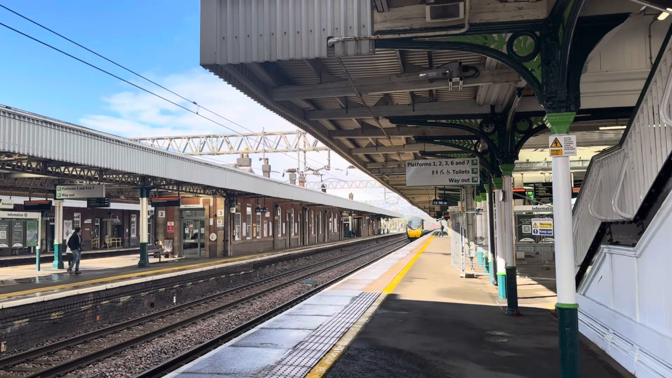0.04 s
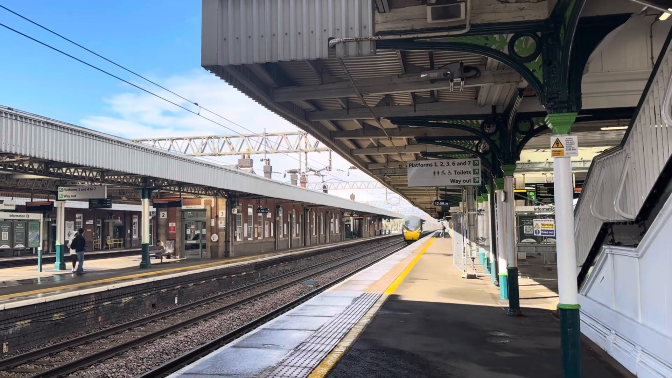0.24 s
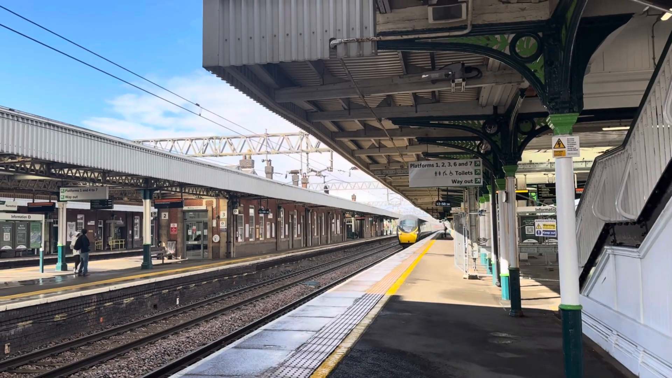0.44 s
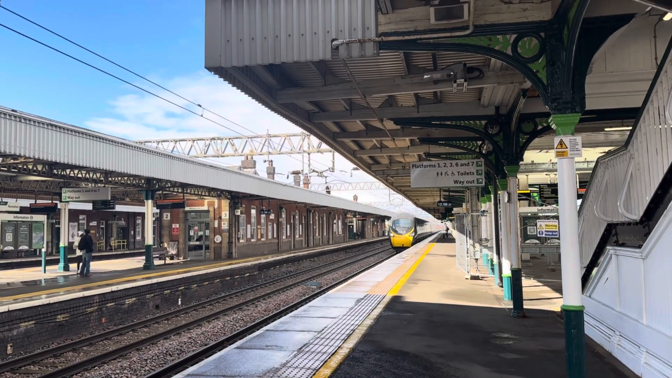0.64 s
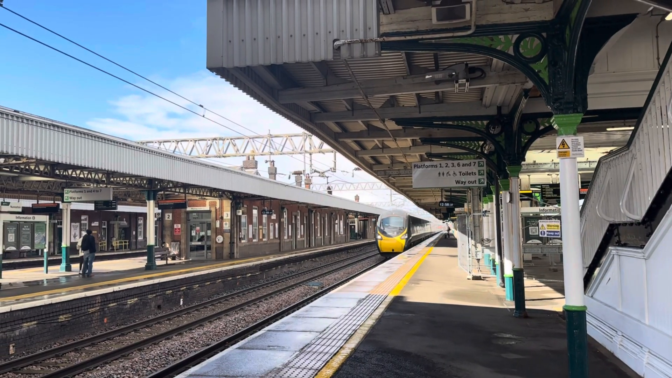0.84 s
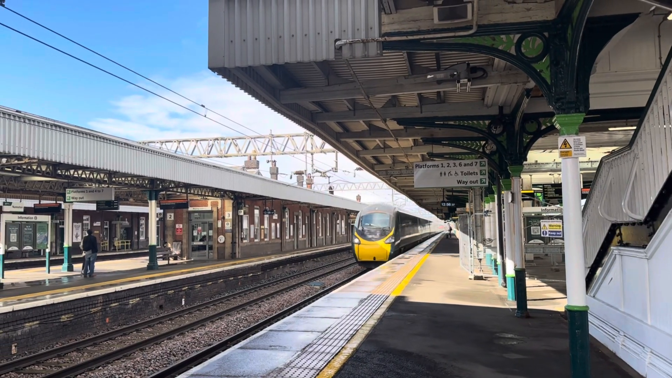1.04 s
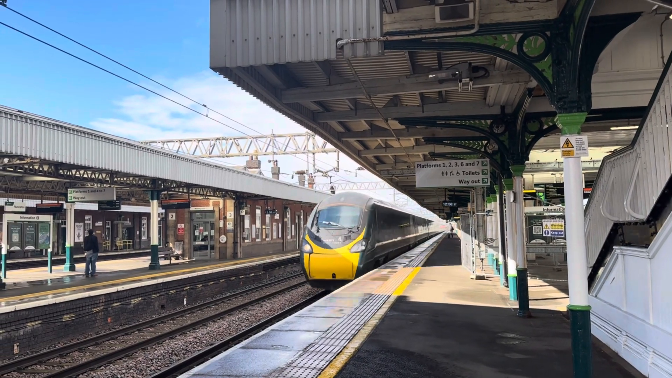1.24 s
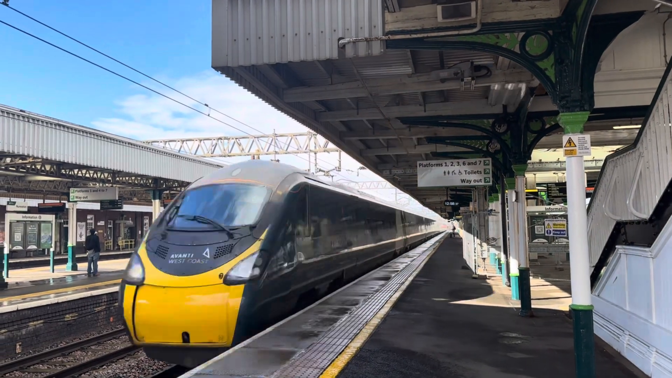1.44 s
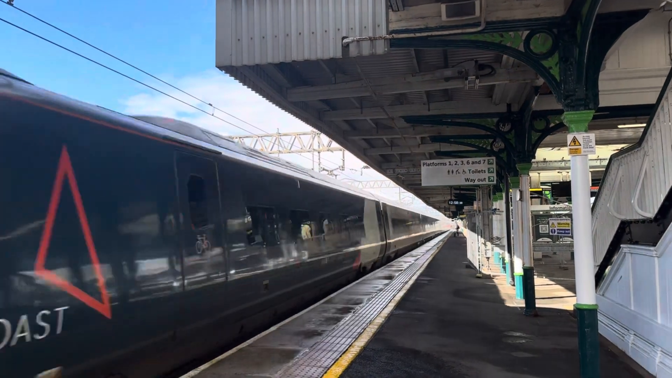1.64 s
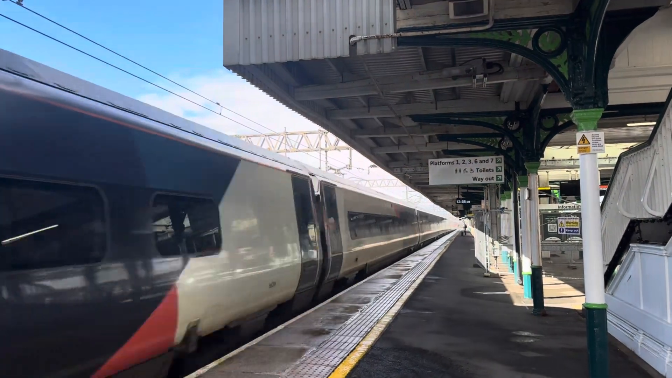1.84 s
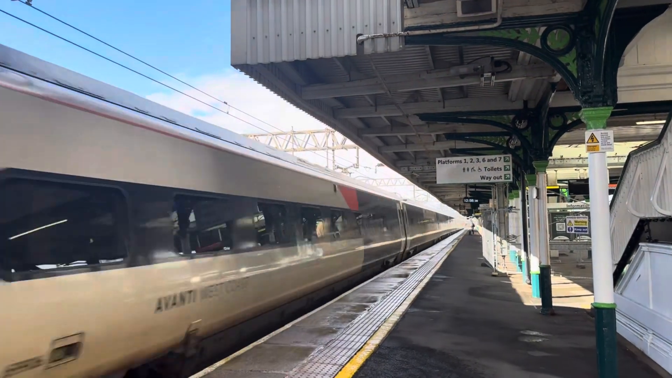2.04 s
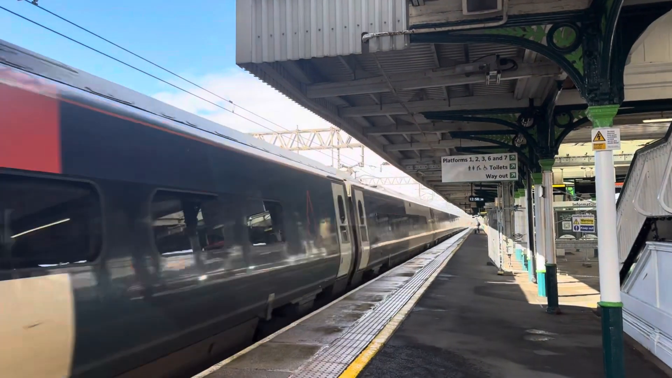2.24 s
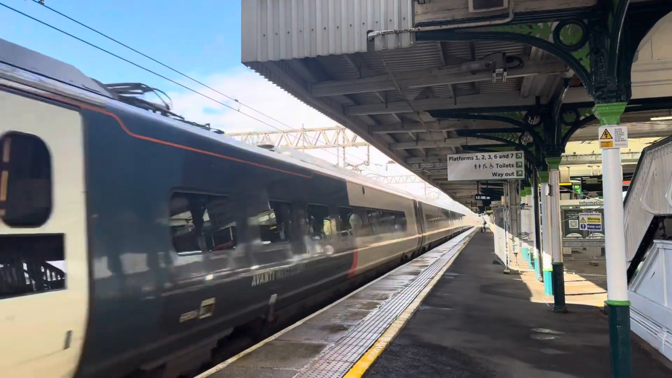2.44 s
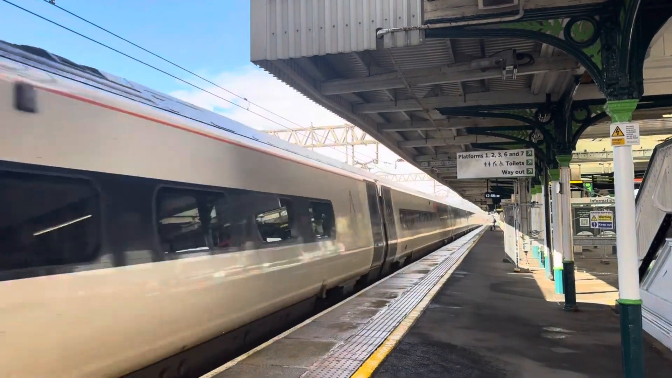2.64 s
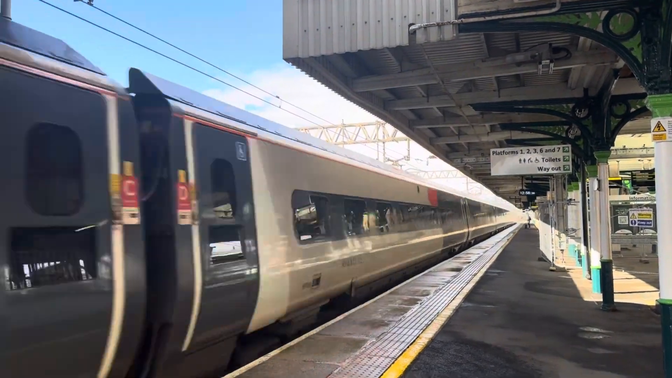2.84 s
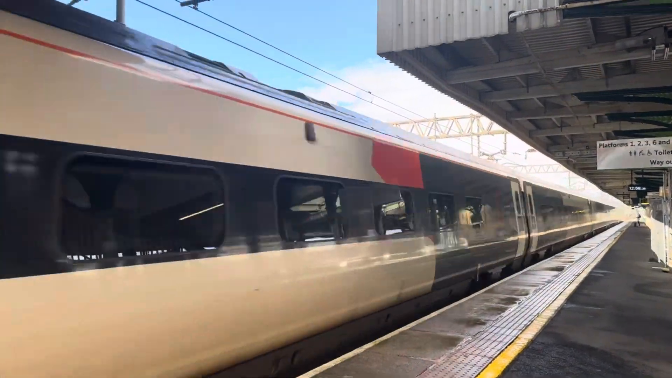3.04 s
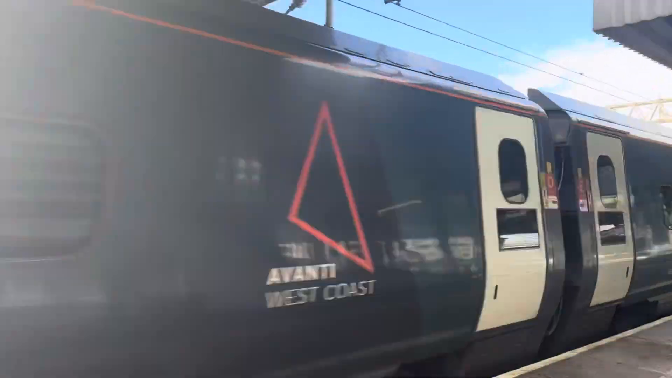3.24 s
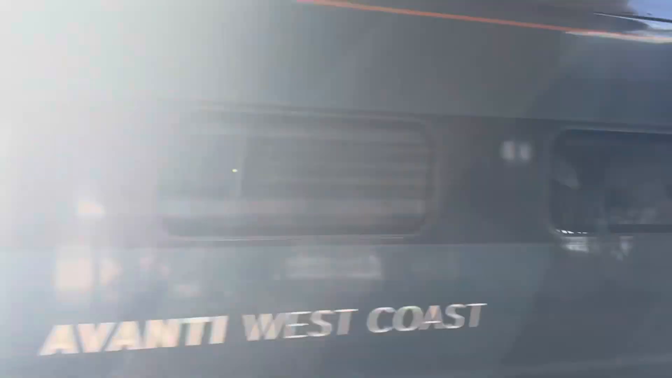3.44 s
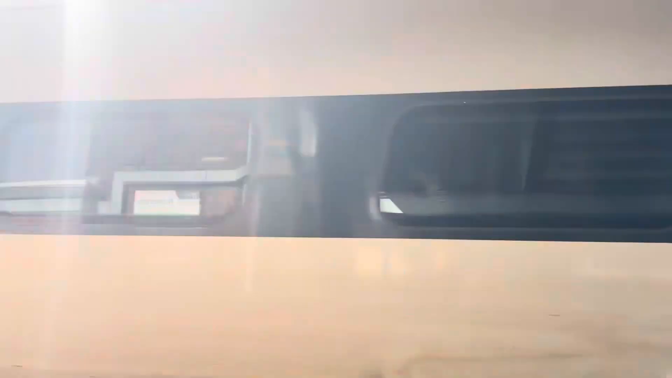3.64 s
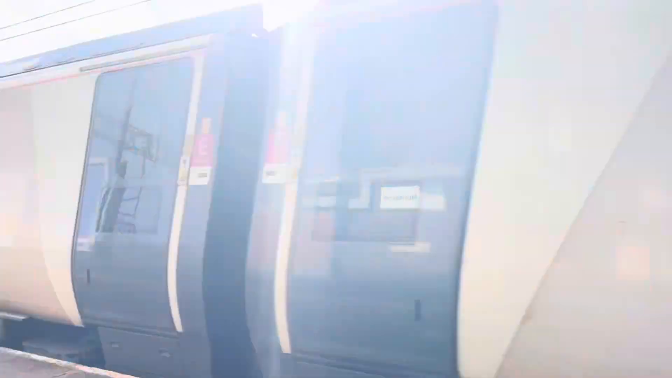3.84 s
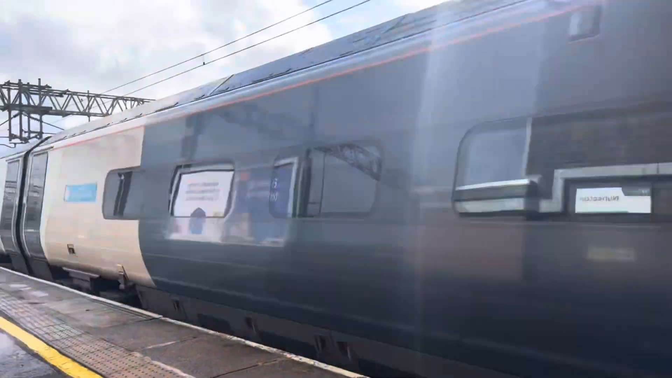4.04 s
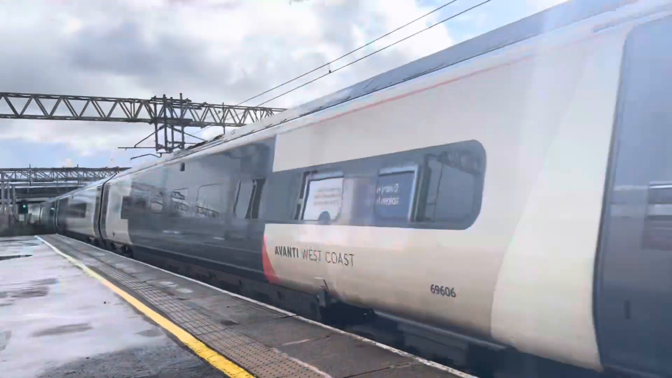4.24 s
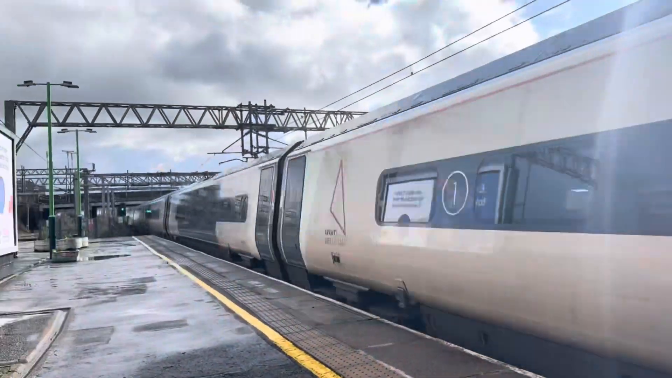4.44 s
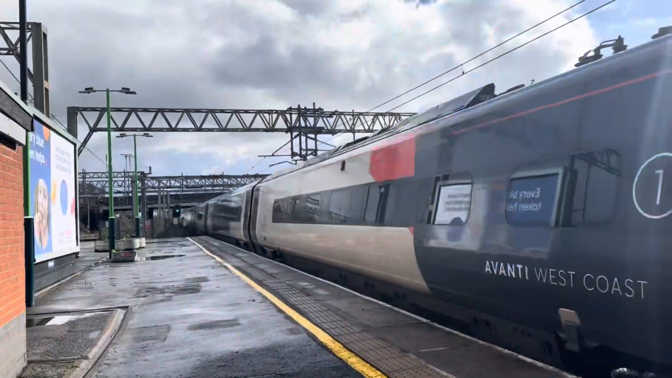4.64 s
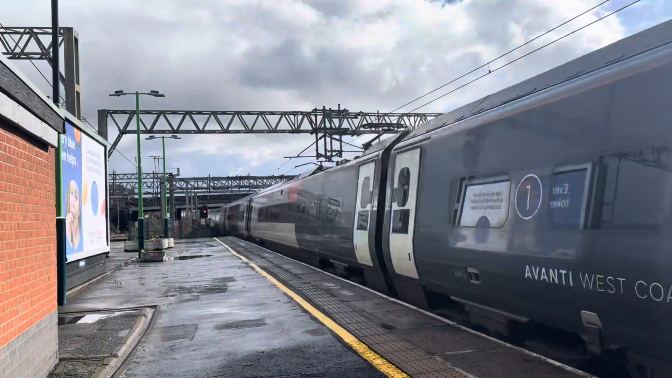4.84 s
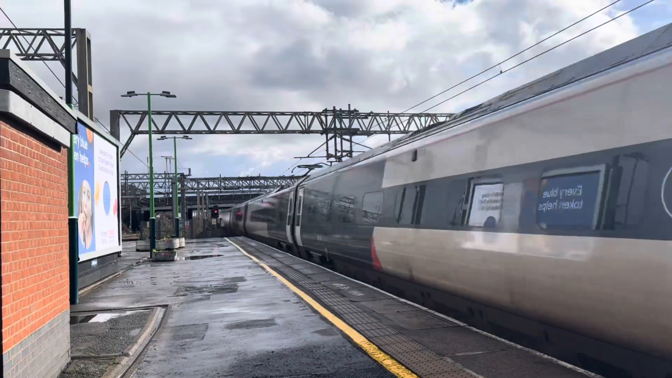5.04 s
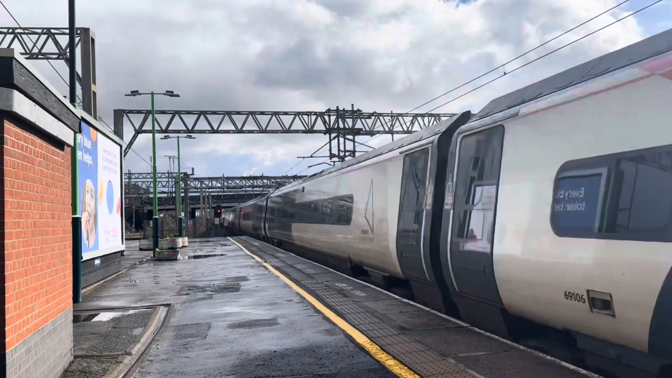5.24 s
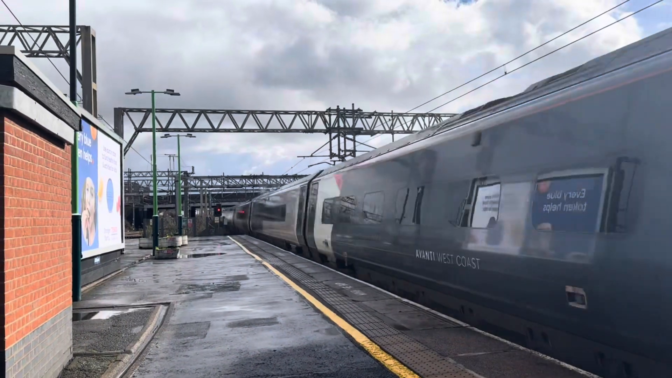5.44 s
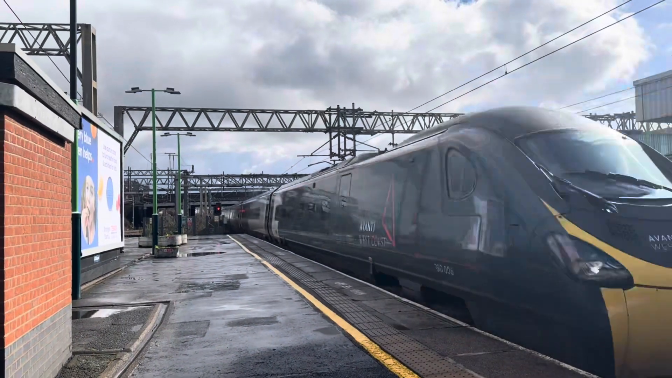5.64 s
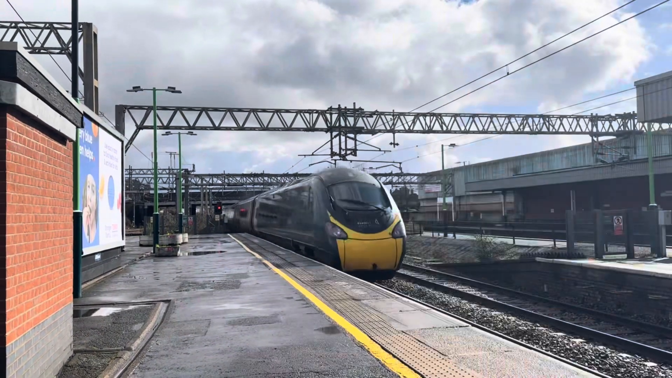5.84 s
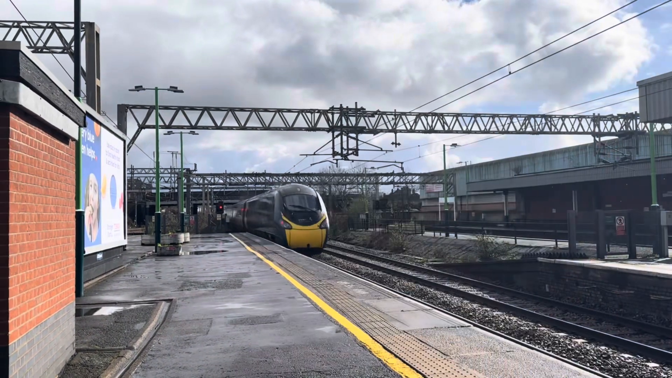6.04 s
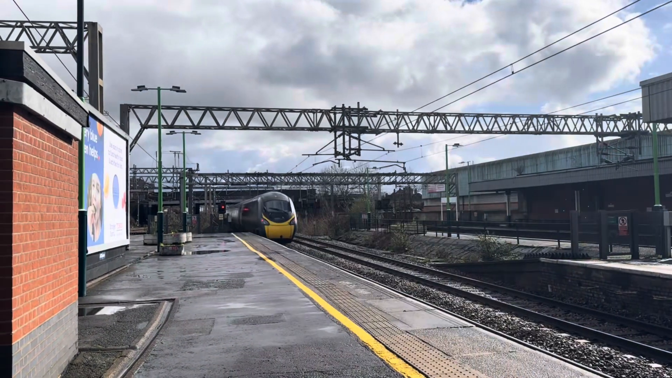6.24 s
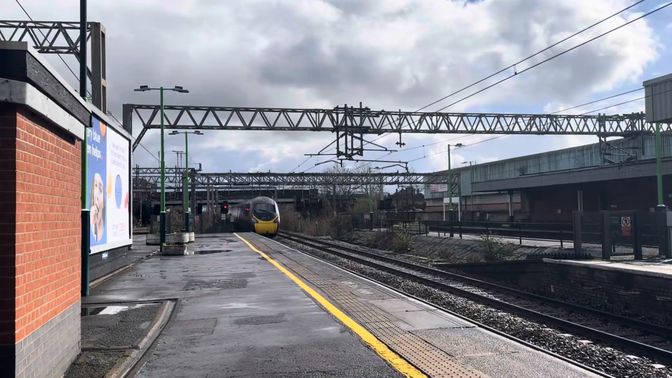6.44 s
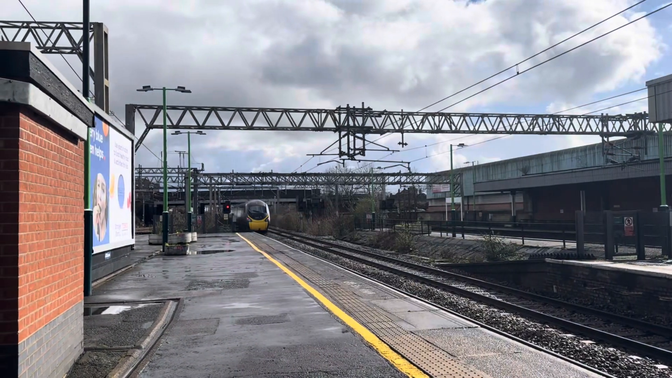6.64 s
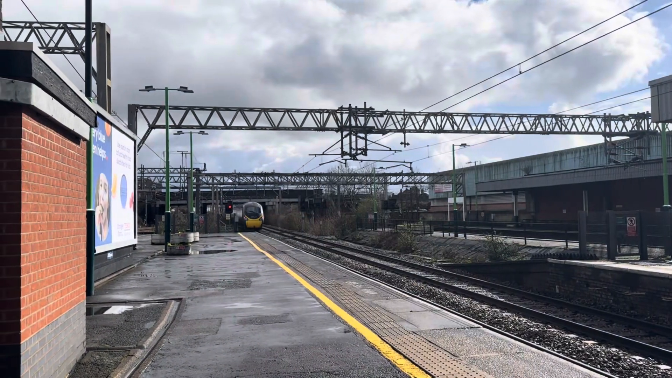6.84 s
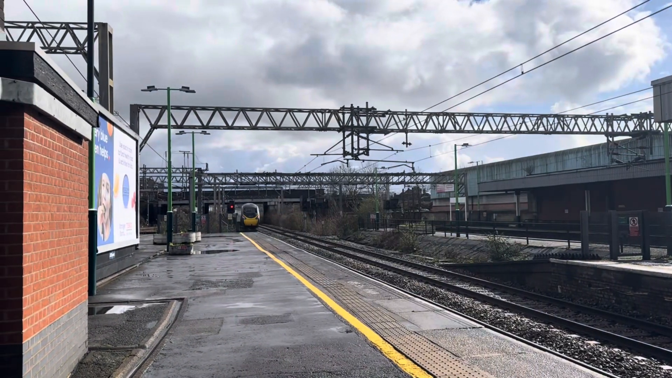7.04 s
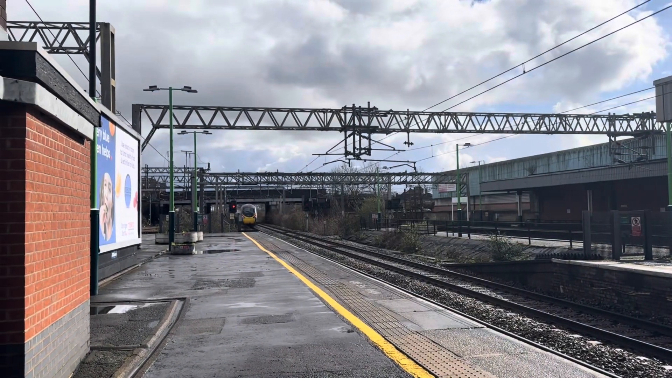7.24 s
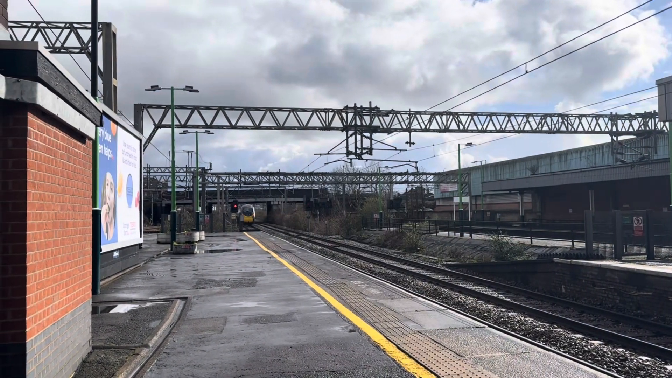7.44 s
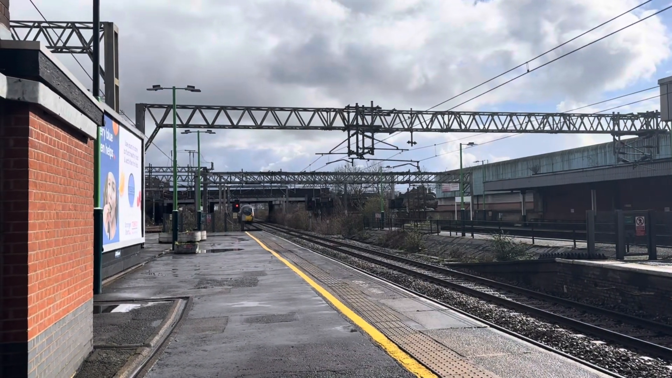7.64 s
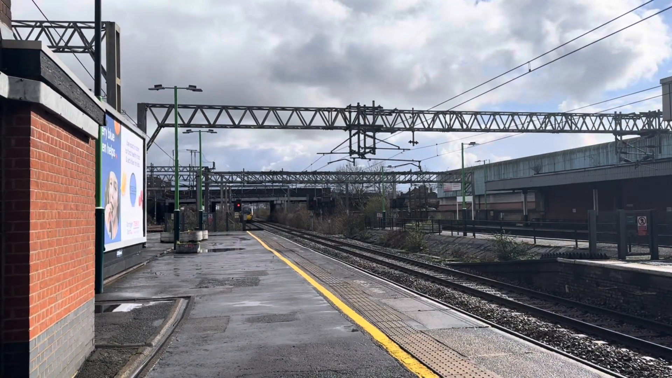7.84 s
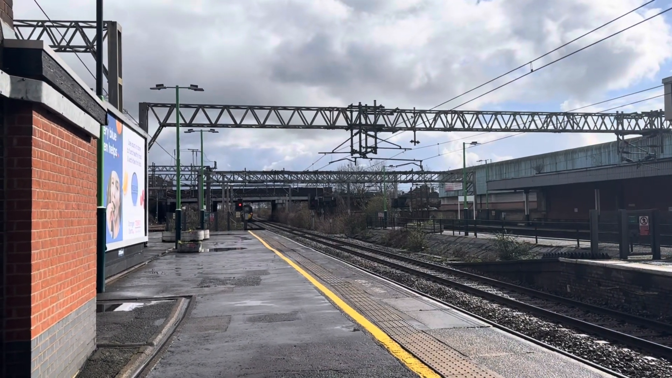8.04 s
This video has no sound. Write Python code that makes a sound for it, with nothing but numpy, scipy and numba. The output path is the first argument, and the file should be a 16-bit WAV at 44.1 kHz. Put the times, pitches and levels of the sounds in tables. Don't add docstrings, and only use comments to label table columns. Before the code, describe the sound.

On an open station platform, a phone close to the track hears an electric express approaching: low rumble, rail hum near 780 Hz, airy hiss and thin high singing, rising steeply from 0 s with dull knocks. Around 1.25-1.5 s the nose bursts past, loudest, with a bright rush, deep buffeting and short falling squeals. From 1.6 to 5.6 s coaches stream by, each coupling a swell of steel whirr, roar and hiss roughly every 0.45 s, over wavering bass thrum, irregular thuds and brief wheel rings. The level eases slightly, and the stereo view turns across the coaches around 3.0-4.0 s; sharp hiss flares appear near 3.9 and 5.3 s. At about 6 s the tail passes and the roar falls away fast. Until 8.1 s a sinking rail hum, wavering faint whine, lumpy low gusts and a few distant soft knocks fade over quiet yard hiss.

```python
import sys
import numpy as np
from scipy import signal
from scipy.fft import rfft, irfft, next_fast_len
from scipy.io import wavfile
from scipy.ndimage import uniform_filter1d
from numba import njit

SR = 44100
rng = np.random.default_rng(int(sys.argv[2]) if len(sys.argv) > 2 else 0)


def voltage_ratio(decibels):
    exponent = np.asarray(decibels, float) / 20
    return 10 ** exponent


def wrap_up_sound(samples):
    columns = np.atleast_2d(samples).T
    tamed = np.clip(columns, -1, 1)
    steps = np.round(tamed * 32767).astype(np.int16)
    wavfile.write(sys.argv[1], SR, steps)


N = 357651

# frequency in Hz, spectral level in dB per Hz.
GROUND_SPECTRUM = [(12, -44), (20, -46), (45, 9), (76, 9), (98, 0.5), (170, -23), (220, -8), (370, -120)]
BUFFET_SPECTRUM = [(65, -17), (110, -0.5), (132, -1.5), (205, -6.5), (280, -14), (360, -15), (620, -120)]
WHEEL_SPECTRUM = [(850, -44), (1450, -4), (1540, 0), (2270, -0.5), (2800, -6), (3640, -17), (6160, -120)]
ROAR_SPECTRUM = [(140, -16.5), (240, -0.5), (480, -5), (660, -9), (860, -21), (1450, -120)]
RUSH_SPECTRUM = [(500, -60), (850, 0), (1210, -5), (1340, -5), (1700, -12), (2210, -21), (3740, -120)]
HISS_SPECTRUM = [(1470, -47), (2500, -6), (2760, -3.5), (4200, -5.5), (6100, -9), (7300, -9), (9490, -56),
                 (16100, -120)]
FIZZ_SPECTRUM = [(6500, -49), (7300, 1), (8300, 4), (9800, 2.5), (11500, -5), (13000, -7), (14500, -6.5),
                 (15900, -10), (16500, -50)]
STATION_SPECTRUM = [(7000, -44), (9000, -1), (11000, 2), (14500, -5), (16000, -20)]

# time in seconds, nearness in dB, push of bow wave and draught in dB.
PASS = [(0, -9.5, 0.5), (.5, -5, 3), (.9, 0, 4.5), (1.25, 7.5, 7.5), (1.5, 6.5, 6.5), (1.95, 6, 2),
        (2.25, 3, 2), (2.7, 0, 2.5), (3.1, -0.7, 1.5), (3.6, -1.5, 1.5), (4.1, -2.5, 0.5), (4.9, -1, 0),
        (5.5, -3, 2), (5.75, -6, 2.5), (6.1, -11, -0.5), (6.7, -16.5, 1), (7.3, -21.5, 0.5),
        (8.11, -24, -1.5)]
# time in seconds, share ahead of the nose (0-1), share behind the tail (0-1),
# how far the phone faces the coaches (0-1).
POSE = [
    (0, 1, 0.38, 0.6),
    (1.0, 0.71, 0.27, 0.43),
    (1.3, 0.17, 0.09, 0.3),
    (3.0, 0, 0, 0.44),
    (3.6, 0.11, 0.057, 0.84),
    (5.5, 0.12, 0.054, 1),
    (6.1, 0.084, 0.86, 0.6),
    (7.0, 0.26, 1, 0.46),
    (8.2, 0.089, 0.28, 0.6),
]
# steel swell in dB, draught swell in dB, hiss swell in dB.
COUPLINGS = [
    (4, 2, 1.3),
    (6.5, 3, 3.5),
    (8.5, 3, 3),
    (9.5, 0.5, 3.5),
    (6.5, 2.5, 3.5),
    (6.5, 1.5, 3),
    (4, 2.5, 3),
    (8.5, 4, 4),
    (1, 4, 4.5),
    (3.5, 2, 3),
]
FIRST_COUPLING_S, COACH_S = 1.57, 0.447
STEEL_SWELL_S, AIR_SWELL_S, AIR_LEADS_S = 0.08, 0.12, 0.007
# time in seconds, length in seconds, hiss in dB.
TEARS = [(1.3, 0.06, 1), (1.47, 0.02, 2), (1.56, .03, -2), (1.66, 0.046, 1.4), (2.66, 0.049, -2.5),
         (3.62, .05, -1), (3.93, 0.051, 2), (4.05, 0.027, 0), (4.19, 0.041, 0.8), (5.27, 0.056, 4.5),
         (5.35, 0.037, 1.5), (5.6, .05, 0)]
# time in seconds, length in seconds, draught in dB.
GUSTS = [(.55, 0.05, 1), (1.22, 0.046, -2), (1.4, 0.054, 1.5), (1.76, 0.053, 1), (3.6, 0.038, -1.5),
         (6.5, 0.056, 1), (6.78, 0.054, 4), (7.0, 0.049, 1.5), (7.22, 0.08, 0.5), (7.5, 0.05, 3),
         (7.83, 0.036, -4.5), (8.07, 0.035, 5)]
# time in seconds, length in seconds, level in dB.
THUDS = [(.0, .03, -6), (.1, 0.027, 3), (.23, 0.039, -5.5), (.38, 0.034, 4), (.8, 0.091, 3),
         (1.13, 0.038, 2.5), (1.42, 0.024, 6), (1.5, 0.044, -0.5), (1.7, 0.023, 2), (1.79, 0.018, 7),
         (1.87, 0.039, -8), (1.95, 0.035, 6), (2.3, 0.086, -8), (2.44, 0.045, 5), (2.65, 0.059, 2),
         (2.96, 0.053, 5), (3.08, .04, -2), (3.61, 0.028, 4), (3.81, 0.028, 8.5), (4.03, 0.035, -3),
         (4.28, 0.021, 9), (4.62, 0.044, -1), (5.0, .06, -2), (5.66, .04, 5), (5.81, .03, 2),
         (6.27, 0.082, -10), (6.5, 0.039, 6.5), (6.8, 0.039, 3.5), (6.95, 0.026, 11), (7.55, 0.085, 2)]
# time in seconds, length in seconds, buffet in dB.
SLAPS = [(.1, .06, 1), (1.02, 0.027, 8), (1.15, 0.16, -7), (1.69, 0.062, 6), (1.79, 0.023, 0),
         (1.93, 0.053, 5), (2.35, .1, 2.5), (2.87, 0.035, 8), (3.25, 0.17, -1.5), (3.85, 0.083, 3),
         (4.6, 0.059, 0.5), (5.7, 0.15, 4.5), (7.55, 0.16, 5.5), (7.0, 0.055, 2.5)]

# level in dB, share of nearness, share of push, extra dB ahead of the nose, share of swell.
THRUM_LAW = (-24, 0.62, .5, 1.5, -0.23)
BUFFET_LAW = (-30, .5, 0.7, -5.5, 1)
RAIL_LAW = (-35.5, 0.88, 0.64, 7.5, 0.71)
WHEEL_LAW = (-33, 0.9647, -0.07, 2.5, 0.31)
ROAR_LAW = (-31, 0.8752, 1.2, 0.5, 1.13)
RUSH_LAW = (-40, 0.71, 0.7, 6.5, 0.64)
HISS_LAW = (-35.5, 1.12, -0.05, -0.1, 0.87)
FIZZ_LAW = (-42.5, 0.87, 0.52, -2, 1.03)

# time in seconds, centre in Hz, width in Hz.
THRUM_NOTE = [(0, 67.1, 18), (.35, 56.5, 18.4), (.85, 71.5, 37.4), (1.2, 87, 22.6), (1.5, 73.3, 84),
              (1.75, 54.3, 21), (2.0, 76, 25), (2.4, 70.96, 60), (2.9, 99.4, 29.6), (3.62, 83.6, 25.4),
              (3.82, 109.8, 18.5), (4.05, 95, 48.5), (4.28, 88.5, 24.6), (4.6, 113, 32.5),
              (5.1, 101.6, 33.4), (5.62, 49.6, 30), (5.9, 70.3, 83), (8.2, 70, 110)]
# time in seconds, core level in dB.
RAIL_CORE = [
    (0, -12),
    (1.0, -2.5),
    (1.8, -6),
    (2.6, -6),
    (3.7, 2.5),
    (5.5, -2),
    (6.2, 4),
    (8.2, -1.5),
]
# frequency in Hz, width in Hz, level in dB.
WHEEL_MODES = [(1900, 80, -15), (2060, 90, -13), (2210, 90, -13), (2350, 90, -13), (2480, 80, -15)]
# frequency in Hz, width in Hz, dB above the fizz.
SING_AHEAD = [(6905, 45, -13), (7325, 30, -13), (7668, 30, -4.5), (8390, 45, -12), (9525, 60, -6),
              (10690, 80, -10)]
SING_BEHIND = [(7180, 60, -14), (8105, 40, -15), (8315, 40, -15), (6450, 100, -14), (9600, 300, -6)]
# time in seconds, peak in dB, pitch in Hz.
KNOCKS = [(0.061, -19, 70.0), (0.276, -18, 64.6), (0.439, -14, 75.4), (0.493, -16, 97), (0.576, -20, 64.6),
          (0.65, -11, 75.4), (0.698, -10, 70.0), (0.876, -6, 68), (0.964, -10, 111), (1.005, -13, 105),
          (1.101, -13, 56.5), (1.102, -8, 95), (1.191, -8, 86.1), (1.236, -10, 87), (1.386, -9, 88.8),
          (1.586, -14, 102.3), (1.623, -10.5, 125), (1.695, -10, 83.4), (1.916, -9, 130), (2.127, -12, 88),
          (2.264, -16, 132), (2.39, -9, 108), (2.446, -10, 72.2), (2.512, -14, 91.8), (2.63, -10, 90.4),
          (2.681, -12, 79), (2.736, -13, 110.8), (2.859, -14, 86.1), (2.933, -10, 99.7), (3.151, -24, 56.5),
          (3.155, -17, 94.2), (3.24, -15.5, 91.6), (3.406, -15, 88.8), (3.584, -11, 86.9),
          (3.776, -9, 105.4), (3.882, -18, 91.5), (4.039, -18, 102), (4.165, -18, 80.4), (4.264, -28, 56.5),
          (4.263, -9, 94.2), (4.482, -13, 105), (4.612, -14, 101.1), (4.781, -16, 91.5),
          (4.923, -12.5, 94.2), (4.987, -12, 86), (5.04, -16, 95), (5.08, -15, 105.7), (5.201, -17, 69.4),
          (5.317, -18, 89.4), (5.367, -18, 104.5), (5.554, -14, 59.2), (5.606, -16, 113),
          (5.691, -20, 147.5), (5.709, -12.5, 73.8), (5.788, -18, 83.5), (5.861, -22, 91),
          (6.492, -23, 127), (6.631, -27, 81), (6.778, -27, 102), (7.522, -25, 144.6)]
FAR_KNOCKS = [
    (6.919, -27, 67.3),
    (7.388, -29, 102),
    (7.436, -28, 113),
    (7.512, -26, 132),
    (7.687, -28, 156),
    (7.91, -31, 56.5),
    (7.912, -30, 59.2),
    (7.981, -26, 64),
]
# time in seconds, first Hz, last Hz, length in seconds, level in dB.
SQUEALS = [(1.403, 1847, 1690, .04, -29), (1.55, 1940, 1790, .05, -29), (1.65, 1880, 1780, .03, -35),
           (1.973, 2480, 2350, .04, -39), (2.04, 2230, 2210, 0.028, -35), (2.065, 1904, 1800, 0.029, -30),
           (2.6, 2200, 2130, 0.023, -35), (2.839, 2462, 2399, 0.049, -38), (2.891, 2570, 2480, 0.054, -45),
           (2.992, 2350, 2280, .07, -38), (2.95, 2160, 2070, 0.062, -42), (3.304, 2370, 2330, .06, -39),
           (3.36, 2180, 2082, 0.052, -43), (3.43, 2230, 2113, 0.025, -39), (3.6, 2036, 1936, .09, -38),
           (4.451, 2048, 1993, .05, -43), (5.221, 2082, 2020, 0.051, -46), (5.33, 2030, 1982, .07, -45),
           (6.194, 720, 707, 0.098, -50), (6.497, 710, 698, .08, -48.5), (7.004, 720, 692, .1, -55),
           (7.483, 732, 698, 0.063, -51), (6.11, 1980, 1920, .1, -61), (6.299, 1920, 1900, 0.047, -55),
           (6.62, 2000, 1970, .08, -52), (6.9, 1913, 1907, 0.13, -62), (7.15, 2040, 2010, 0.075, -54),
           (7.351, 1924, 1890, .12, -56.5), (7.8, 1925, 1910, .15, -61), (.1, 7670, 7660, 0.087, -56),
           (.6, 7530, 7800, 0.087, -55), (1.02, 7680, 7660, 0.048, -47), (.5, 10690, 10680, .3, -58),
           (1.252, 10600, 10670, 0.16, -46), (6.85, 7170, 7170, .1, -69), (7.168, 7190, 7180, .06, -65),
           (7.699, 7240, 7100, .2, -75)]
# time in
# seconds, Hz, width in Hz, length in seconds, level in dB.
PASSING_RINGS = [(1.1, 530, 250, 0.27, -21.5), (5.094, 780, 150, 0.029, -25.5),
                 (.55, 835, 115.4, 0.023, -27), (.71, 780, 150.5, 0.06, -27.5),
                 (0.967, 900, 150, 0.024, -24), (3.701, 765, 60, 0.022, -34),
                 (3.828, 781, 59.96, 0.06, -30), (4.17, 768, 50.25, 0.092, -28.5),
                 (4.647, 121, 39.9, 0.045, -21.5), (5.651, 239.9, 100.1, 0.038, -29),
                 (1.54, 1890, 300, 0.13, -24.5), (4.636, 390, 150, 0.041, -29.5),
                 (1.7, 203, 70, 0.031, -16), (1.969, 2380, 200, 0.092, -33),
                 (2.051, 1734, 150, 0.14, -29.5), (2.932, 2332, 350, 0.13, -35.5),
                 (3.37, 2270, 350, 0.12, -36.5), (4.201, 10520, 500.2, .04, -43),
                 (4.447, 2050, 149.7, 0.091, -41), (4.649, 609, 400, 0.039, -26),
                 (5.302, 2038, 200, 0.066, -36.5), (5.278, 9520, 398, .06, -46), (6.95, 6820, 60, .04, -66)]

# frequency in Hz, likeness (0-1),
# right lead in radians, left minus right in dB.
ALONG = [(0, 0.99, 0, 0.5), (250, 0.93, -0.12, -0.5), (457, 0.92, -1.5, -0.5), (860, 0.84, -1.05, 4),
         (1160, 0.22, -3.5, 7), (1700, 0.9, -5, -0.5), (2160, 0.36, -5.5, 0.5), (2820, 0.6, -8.5, 6.5),
         (3180, 0.6, -8, 9), (4350, 0.72, -8, 1), (5040, 0.1, -3, 8), (5300, 0.26, -4, -2),
         (5900, .4, -5, -1), (7040, .1, -9, 0.5)]
ACROSS = [(0, 1, -0.2, 0), (250, .9, 0.22, 0), (600, 0.41, 0.74, 0.5), (1000, .25, 1.1, .3),
          (1390, 0.31, 1.75, 0), (2091, 0.43, 0.21, .3), (2780, 0.26, -2.5, 2.5), (3300, .3, -0.78, 4.5),
          (4200, .3, -.7, 1), (5100, 0.076, -.5, 1.5), (6000, 0.69, 0, 1.5), (7050, .1, -0.024, 0)]
# frequency in Hz, right lead in half turns.
ONE_CAPSULE = [(7000, -.5), (8000, 0), (9550, 1), (11200, 2), (12700, 3), (14000, 4), (15750, 5),
               (17000, 6)]
# frequency in Hz, aimed along (0-1), aimed at the coaches (0-1).
HANDOVER = [(7200, .1, .1), (7800, .9, .72), (8300, .88, .72), (8900, .8, .75), (9400, 1, 1)]

TAIL_S = 5.97


def unit(x):
    return x / np.sqrt(np.mean(x ** 2, axis=-1, keepdims=True))


def columns(table):
    s, *rest = np.transpose(table)
    return [np.interp(np.arange(N) / SR, s, c) for c in rest]


def since(start_s):
    return np.maximum(np.arange(N) / SR - start_s, 0)


@njit
def band_pass(x, g, k):
    y, band, low = np.empty(len(x)), 0., 0.
    for i in range(len(x)):
        v = (band + g[i] * (x[i] - low)) / (1 + g[i] * (g[i] + k[i]))
        band = 2 * v - band
        low = low + 2 * g[i] * v
        y[i] = k[i] * v
    return y


def ring(hz, width_hz, size=N):
    g = np.tan(np.pi * hz / SR) + np.zeros(size)
    k = width_hz / hz + np.zeros(size)
    once = band_pass(rng.standard_normal(size), g, k)
    return unit(band_pass(once, g, k) / np.sqrt(width_hz))


def coloured(spectrum):
    size = next_fast_len(N)
    hz, db = np.transpose(spectrum)
    bins_hz = np.arange(1, size // 2 + 2) * SR / size
    gain = voltage_ratio(np.interp(np.log(bins_hz), np.log(hz), db, left=-99, right=-99))
    return unit(irfft(rfft(rng.standard_normal(size)) * gain, size)[:N])


def walk(rate):
    k = int(SR / rate)
    held = np.repeat(rng.standard_normal(N // k + 1), k)
    return uniform_filter1d(uniform_filter1d(held, k), k)[:N]


def bells(rows):
    t = np.arange(N) / SR
    return sum(db * np.exp(-.5 * ((t - s) / length) ** 2) for s, length, db in rows)


def swells():
    at = FIRST_COUPLING_S + COACH_S * np.arange(len(COUPLINGS))
    steel_db, draught_db, hiss_db = np.transpose(COUPLINGS)

    def beat(s, length, db):
        return bells(zip(s, length + 0 * s, db))

    steel = beat(at, STEEL_SWELL_S, steel_db)
    draught = beat(at - AIR_LEADS_S, AIR_SWELL_S, draught_db) + bells(GUSTS)
    hiss = beat(at - AIR_LEADS_S, AIR_SWELL_S, hiss_db) + bells(TEARS)
    return steel, draught, hiss


def layer_db(law, swell_db):
    level_db, near, push, ahead_db, swell = law
    near_db, push_db = columns(PASS)
    return level_db + near * near_db + push * push_db + ahead_db * columns(POSE)[0] + swell * swell_db


def thrum():
    db = layer_db(THRUM_LAW, swells()[1]) + bells(THUDS)
    hz, width_hz = columns(THRUM_NOTE)
    phase = 2 * np.pi * np.cumsum(hz + .45 * width_hz * walk(18)) / SR
    note = np.sin(phase) * 22 / width_hz
    return voltage_ratio(db) * (note + voltage_ratio(-5.0) * ring(hz, 70) + voltage_ratio(-7.5) * coloured(GROUND_SPECTRUM))


def buffet():
    db = layer_db(BUFFET_LAW, swells()[1]) + bells(SLAPS)
    return voltage_ratio(db) * coloured(BUFFET_SPECTRUM)


def rail():
    db = layer_db(RAIL_LAW, swells()[0])
    ahead, behind, _ = columns(POSE)
    core = ring(775 + 15 * ahead - 75 * behind, 80 + 130 * np.abs(ahead))
    return voltage_ratio(db) * (voltage_ratio(columns(RAIL_CORE)[0]) * core + voltage_ratio(1.5) * ring(711, 367))


def wheels():
    bogies, _, tears = swells()
    db = layer_db(WHEEL_LAW, bogies + tears)
    ahead, behind, _ = columns(POSE)
    modes = sum(voltage_ratio(mode_db + 5 * walk(11)) * ring(hz + 60 * walk(5), width_hz)
                for hz, width_hz, mode_db in WHEEL_MODES)
    alongside = np.clip(1 - behind - ahead, 0, 1)
    far = since(7.25)
    whine = ring(1990 + 25 * walk(2) + 500 * far, 170 + 1800 * far)
    tail = voltage_ratio(-3.5 + 2.5 * walk(8)) * behind * whine
    nose = voltage_ratio(-5.0) * ahead * ring(1685, 190)
    return voltage_ratio(db) * (coloured(WHEEL_SPECTRUM) + alongside * modes + nose + tail)


def wake_roar():
    draught = swells()[1]
    behind = columns(POSE)[1]
    fade_db = 1.5 * since(TAIL_S)
    roar_db = layer_db(ROAR_LAW, draught) - fade_db
    nose_db = bells([(1.43, 0.17, 4)])
    rush_db = layer_db(RUSH_LAW, draught) + nose_db - 3 * behind - fade_db
    return voltage_ratio(roar_db) * coloured(ROAR_SPECTRUM) + voltage_ratio(rush_db + 3.5) * coloured(RUSH_SPECTRUM)


def wake_hiss(flutter):
    db = layer_db(HISS_LAW, swells()[2]) + 1.8 * flutter
    ahead, behind, _ = columns(POSE)
    far_db = -6.5 + 4.1 * since(TAIL_S)
    dull = (voltage_ratio(-4) * ahead + voltage_ratio(far_db) * behind) * ring(3180, 1800)
    dull = dull + voltage_ratio(-3.0) * ahead * ring(4100, 700)
    return voltage_ratio(db) * ((1 - 0.059 * behind) * coloured(HISS_SPECTRUM) + dull)


def fizz_and_rail_song(flutter):
    ahead, behind, _ = columns(POSE)
    db = layer_db(FIZZ_LAW, swells()[2]) + 5 * behind - 5 * since(TAIL_S)
    notes = 0
    for share, table in ((ahead, SING_AHEAD), (behind, SING_BEHIND)):
        for hz, width_hz, note_db in table:
            notes = notes + share * voltage_ratio(note_db + 2.5 * walk(12)) * ring(hz, width_hz)
    sheen = (voltage_ratio(-1.0) * ahead + voltage_ratio(-3.5) * behind) * ring(11100, 7000)
    fizz = voltage_ratio(2.0 - 2.6 * behind) * coloured(FIZZ_SPECTRUM)
    return voltage_ratio(db) * (voltage_ratio(0.43 * flutter) * (fizz + sheen) + notes)


def station():
    return voltage_ratio(-63) * coloured(STATION_SPECTRUM)


def knocks():
    rise_s, fall_s = 0.0094, 0.013
    out, t = np.zeros(N + SR), np.arange(-SR // 10, SR // 5) / SR
    shape = np.exp(-.5 * (t / np.where(t < 0, rise_s, fall_s)) ** 2)
    rows = list(KNOCKS) + list(FAR_KNOCKS)
    for (s, db, hz), turn in zip(rows, rng.random(len(rows))):
        i = int((s + rise_s) * SR) + SR // 2
        out[i - SR // 10:i + SR // 5] += voltage_ratio(db - 5.5) * shape * np.sin(2 * np.pi * (hz * t + turn))
    return out[SR // 2:SR // 2 + N]


def squeals():
    out, t = np.zeros(N + SR), np.arange(N + SR) / SR - .5
    waver, grain = (np.pad(walk(rate), SR // 2) for rate in (55, 35))
    for (s, first_hz, last_hz, length, db), turn in zip(SQUEALS, rng.random((len(SQUEALS), 2))):
        near = np.abs(t - s) < 3 * length
        x = (t[near] - s) / length
        own = int(turn[1] * (N - len(x))) + np.arange(len(x))
        width_hz = 70 if last_hz < 5000 else 25
        glide_hz = (first_hz + last_hz) / 2 + (last_hz - first_hz) / 2 * np.tanh(x)
        hz = glide_hz + width_hz * waver[own]
        note = np.sin(2 * np.pi * (np.cumsum(hz) / SR + turn[0]))
        out[near] += voltage_ratio(db + 4 + 4 * grain[own]) * np.exp(-.5 * x ** 2) * note
    return out[SR // 2:SR // 2 + N]


def passing_rings():
    out, half = np.zeros(N), SR // 2
    for s, hz, width_hz, length, db in PASSING_RINGS:
        bell = np.exp(-.5 * (np.arange(-half, half) / SR / length) ** 2)
        i = int(s * SR)
        out[i - half:i + half] += voltage_ratio(db) * bell * ring(hz, width_hz, size=2 * half)
    return out


def ports(direct, scattered, table, order):
    size = next_fast_len(N)
    f = np.arange(size // 2 + 1) * SR / size
    hz, like, lead, pan_db = np.transpose(table)
    top = np.transpose(HANDOVER)
    like = np.where(f < top[0, 0], np.interp(f, hz, like), np.interp(f, top[0], top[order]))
    like = np.clip(like, 0, 1)
    one_hz, half_turns = np.transpose(ONE_CAPSULE)
    lead = np.where(f < one_hz[0], np.interp(f, hz, lead), np.pi * np.interp(f, one_hz, half_turns))
    half = voltage_ratio(np.interp(f, hz, pan_db) / 2)
    d, s = rfft(direct, size), rfft(scattered, size)
    right = (like * np.exp(1j * lead) * d + np.sqrt(1 - like ** 2) * s) / half
    return irfft(np.array([half * d, right]), size)[:, :N]


def scene():
    ahead, behind, facing = np.clip(columns(POSE), 0, 1)
    flutter = walk(13) * np.clip(1 - .8 * (ahead + behind), 0, 1)
    lumps = voltage_ratio(2.5 * walk(40) * behind - behind)

    def train():
        ground = lumps * (thrum() + buffet())
        air = wake_roar() + wake_hiss(flutter) + fizz_and_rail_song(flutter)
        return ground + rail() + wheels() + air + station() + squeals() + passing_rings()

    blows = knocks()
    direct, scattered = train() + blows, train() + blows
    along = ports(direct, scattered, ALONG, order=1)
    across = ports(direct, scattered, ACROSS, order=2)
    return (1 - facing) * along + facing * across


def roll_off(x):
    return signal.sosfilt(signal.butter(12, 16010, fs=SR, output="sos"), x)


def record(dry):
    ceiling = 1.15
    cut = signal.sosfilt(signal.butter(2, 36, "high", fs=SR, output="sos"), dry)
    mix = ceiling * np.tanh(1.153 * cut / ceiling)
    return roll_off(mix)


dry = scene()
out = record(dry)
wrap_up_sound(out)
```